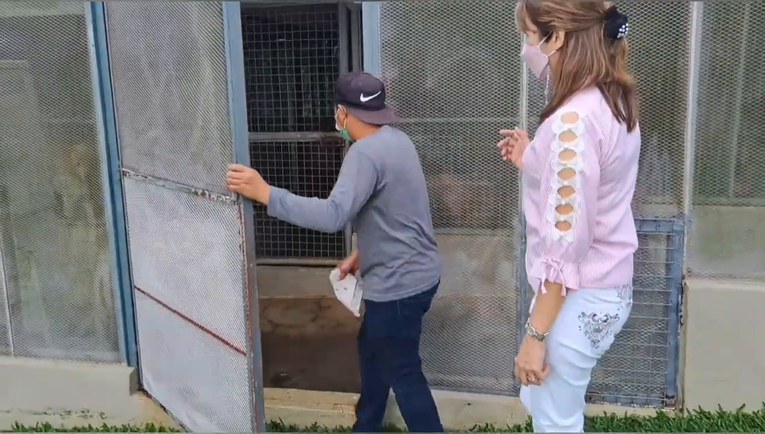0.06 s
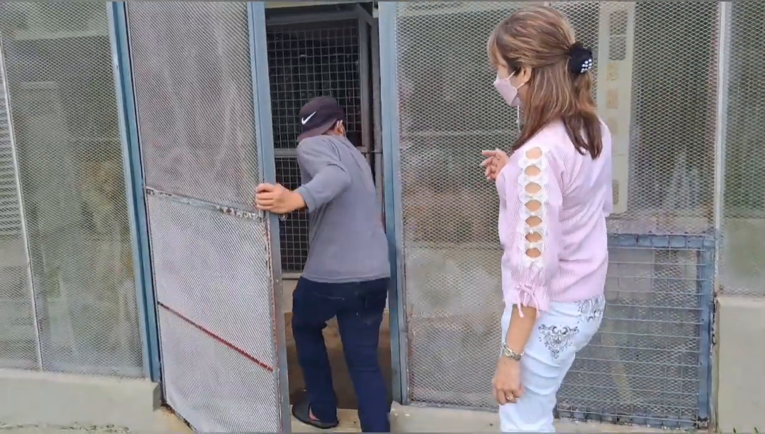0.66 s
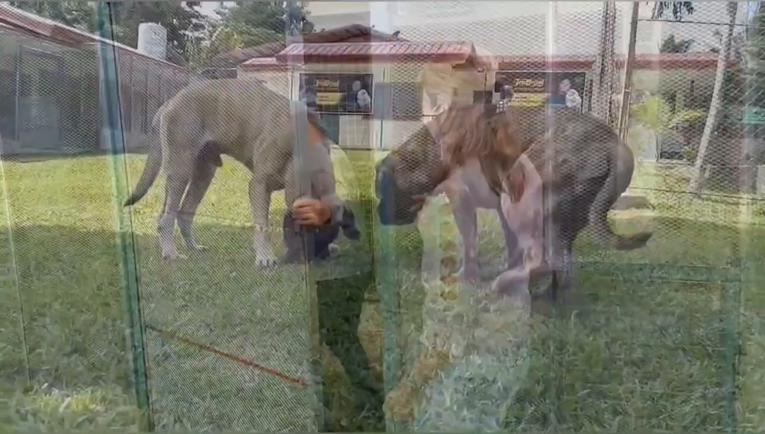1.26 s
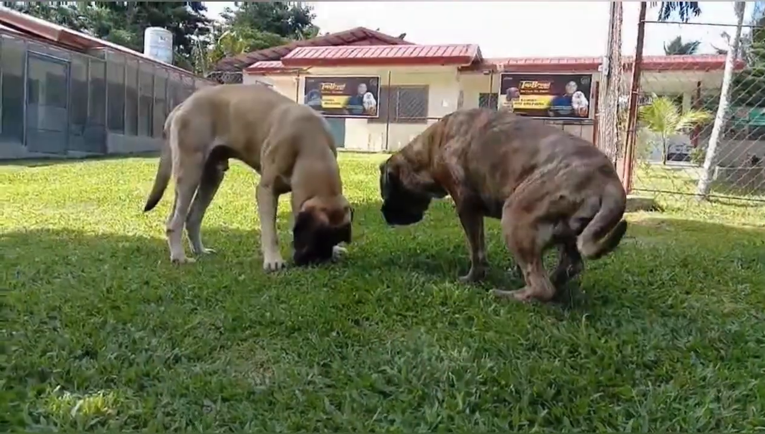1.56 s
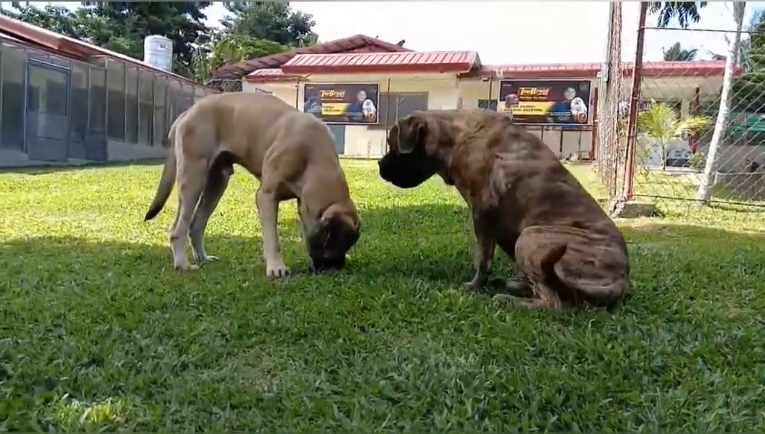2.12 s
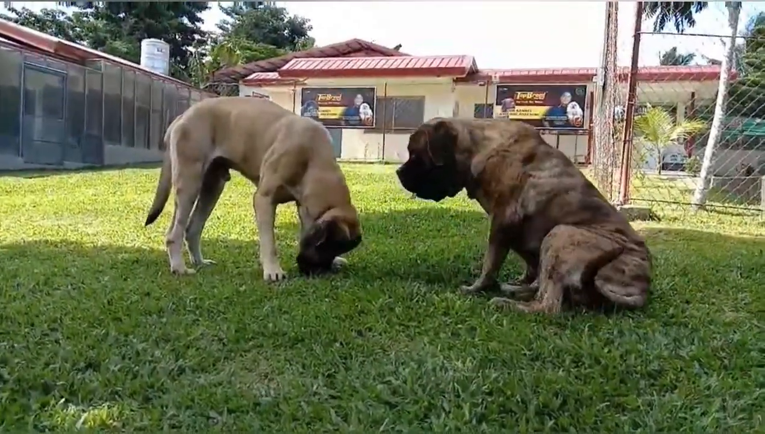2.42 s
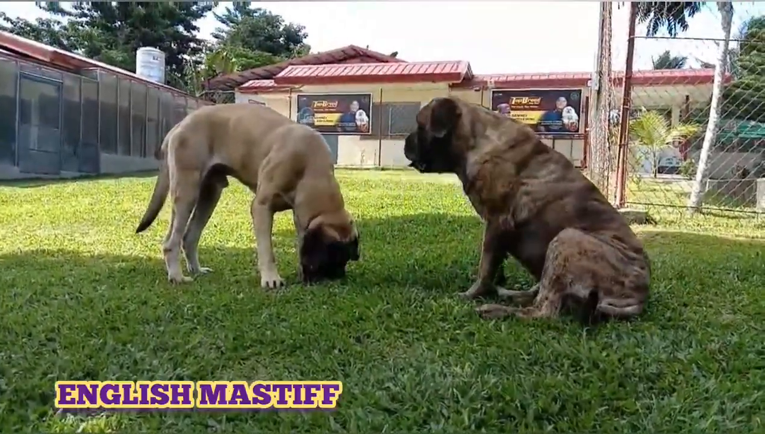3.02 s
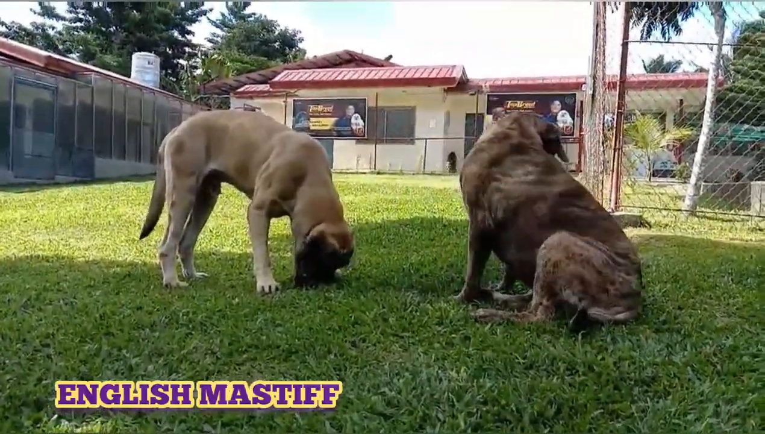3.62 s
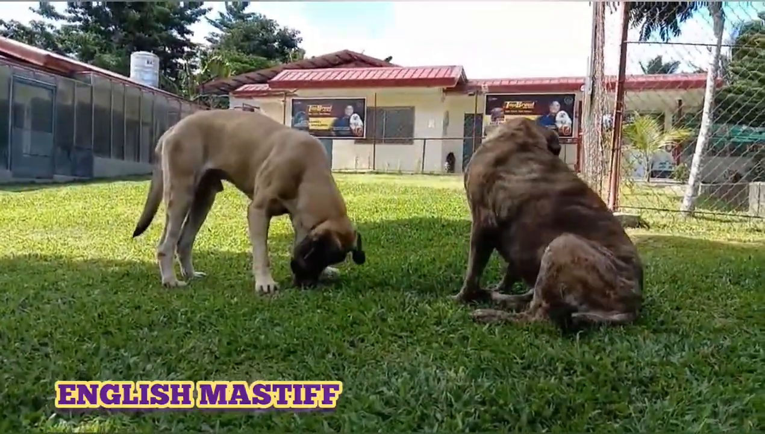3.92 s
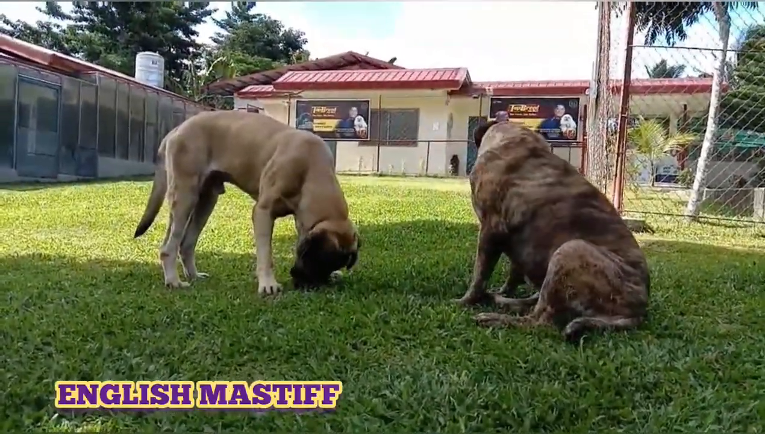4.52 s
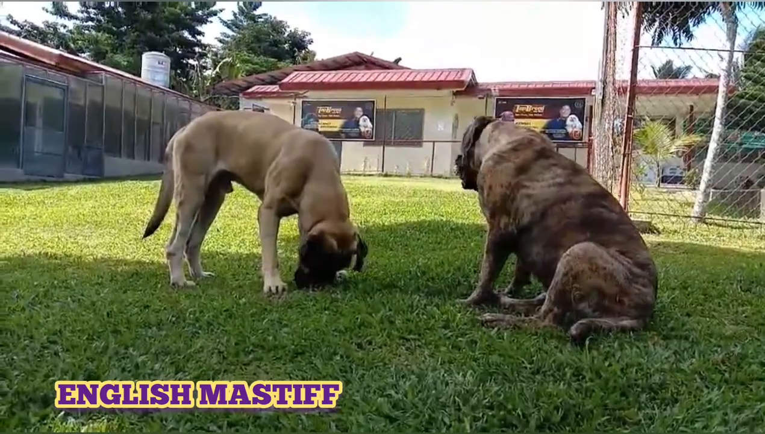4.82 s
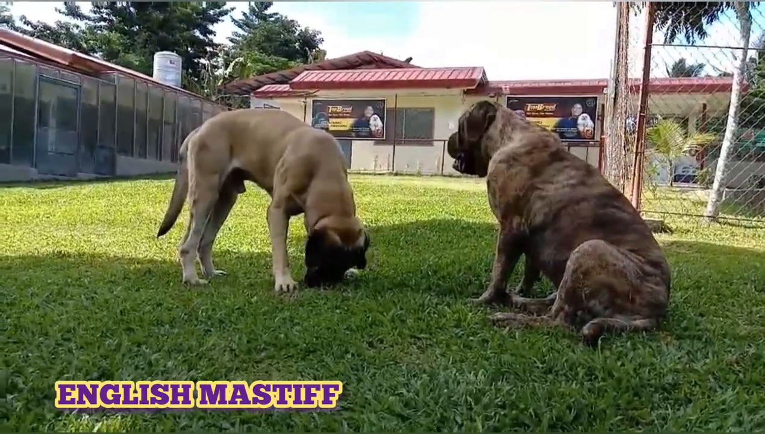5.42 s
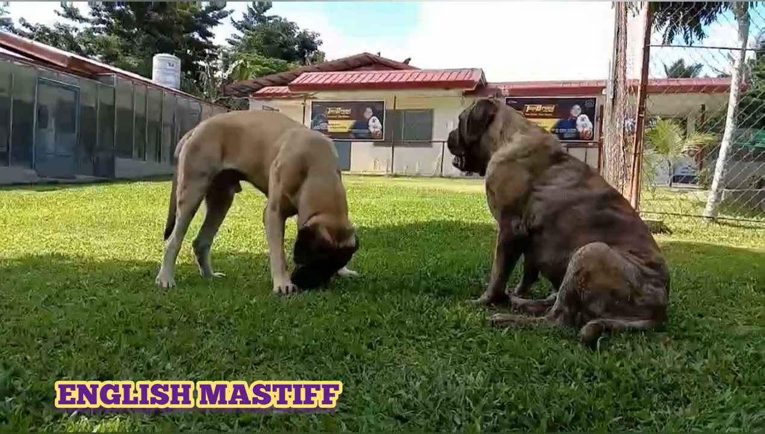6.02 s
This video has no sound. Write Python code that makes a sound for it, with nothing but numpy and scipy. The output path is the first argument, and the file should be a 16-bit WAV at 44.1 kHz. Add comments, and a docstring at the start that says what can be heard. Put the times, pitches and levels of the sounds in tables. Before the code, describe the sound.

A large dog gives two quick pairs of loud, rough barks in a ringing concrete kennel, slightly right of the microphone. A mesh door scrapes and clicks over soft shuffling. The dog adds a fainter yelp and woof as the kennel fades into an open lawn, where insects hiss steadily, birds whistle far away and two soft, low hoots sound.

```python
"""A mastiff barks in two quick pairs, groans and yelps in a concrete kennel, a little right of a stereo
microphone pair. Its vocal folds pulse roughly through throat and mouth, and the walls ring. A mesh door
scrapes and clicks over shuffling and a faint outdoor rumble. The kennel fades into a sunny lawn, heard
straight ahead: insects hiss in two high bands, birds whistle far off and two soft low hoots sound."""
import sys
import numpy as np
from scipy import signal
from scipy.fft import rfft, irfft, next_fast_len
from scipy.io import wavfile
from scipy.ndimage import uniform_filter1d

SR = 44100
rng = np.random.default_rng(int(sys.argv[2]) if len(sys.argv) > 2 else 0)


def dump(signal):
    """Clip the signal to [-1, 1] and save it as 16-bit WAV at the path in sys.argv[1]."""
    limited = np.clip(np.atleast_2d(signal).T, -1, 1)
    pcm = np.round(limited * 32767).astype(np.int16)
    wavfile.write(sys.argv[1], SR, pcm)


N = 276507
TIME = np.arange(N) / SR


# The dog's throat and mouth, one shape per kind of call. Each row: frequency in Hz, gain in dB.
THROAT_1 = [(120, -25), (270, -16), (420, -4), (570, -1), (870, -5), (1150, -6.5), (1420, -15),
            (1700, -9.5), (1950, -14.5), (2280, -10.5), (2700, -20), (3200, -21), (4000, -25.5),
            (5200, -22.5), (6500, -37), (15000, -40)]
THROAT_2 = [(120, -27.5), (240, -15.5), (370, -11.5), (470, 2.5), (540, -2), (780, -13.5), (1100, -17),
            (1400, -18.5), (1680, -15), (1880, -22.5), (2120, -18), (2600, -26), (2900, -27.5),
            (4500, -32.5), (15000, -48)]
THROAT_3 = [(130, -30.5), (310, -17.5), (450, -4.5), (630, -4.5), (950, 0), (1260, -4), (1550, -11.5),
            (1950, -13), (2800, -25), (3700, -26.5), (4450, -16), (6000, -29.5), (9000, -41), (15000, -53)]
THROAT_4 = [(130, -33), (300, -19), (450, -9.5), (620, -3.5), (930, 1), (1240, -13), (1600, -11.5),
            (2000, -17), (2800, -28.5), (4700, -32.5), (9000, -48.5), (15000, -55)]
THROAT_WOOF = [(250, -18), (580, -12), (850, 0), (1150, -14), (2200, -17), (4000, -35), (15000, -55)]
THROAT_YELP = [(250, -25), (690, -6), (1050, -2), (1380, 0), (2050, -7), (2800, -17), (6000, -36),
               (15000, -55)]
# Each row: start, attack, hold and release in seconds, mouth level at full effort in dB, start, top and
# end pitch in Hz, roughness from 0 to 1, chest tone at full effort in dB, throat shape.
CALLS = [(.052, .056, .092, .12, -7.5, 180, 288.1, 278.8, 0.39, -33, THROAT_1),
         (.322, 0.057, 0.12, 0.018, -7, 190, 271.4, 259, 0.3, -30, THROAT_2),
         (0.466, 0.038, 0.084, .04, -22.5, 220, 212.6, 202.7, 0.25, -24, THROAT_2),
         (1.014, .046, 0.084, .1, -7, 205, 315.7, 308.7, 0.3, -32, THROAT_3),
         (1.303, .075, 0.064, .045, -7, 220.3, 315.4, 303, 0.23, -37.5, THROAT_4),
         (1.562, .036, 0.049, 0.076, -17, 402.6, 698.7, 646, 0.17, -57, THROAT_YELP),
         (1.687, .05, .02, 0.016, -11.5, 229, 293, 290, .3, -51, THROAT_WOOF)]

def dog(pan_db=1.43):
    """Right of centre in the kennel: two barks, a low groan, two more barks, a yelp and a last woof."""
    dry = np.zeros(N)
    for start, attack, hold, release, db, start_hz, top_hz, end_hz, held_rough, chest_db, throat in CALLS:
        effort_db, hz, rough = call_contour(attack, hold, release, start_hz, top_hz, end_hz, held_rough)
        add(dry, start, bark(effort_db, hz, rough, throat, db, chest_db))
    return widen(kennel(dry)) * undb([[-pan_db], [pan_db]])


def call_contour(attack, hold, release, start_hz, top_hz, end_hz, held_rough):
    """Effort climbs, sags and drops; the folds roughen as the pitch scoops up and as the voice runs out."""
    onset_db, sag_db_per_s, release_db, shudder_db = 26, 25, 15, 1.4
    settle_s, waver = .025, .014
    t = np.arange(0, attack + hold + release, 1 / SR)
    released_s = np.maximum(t - attack - hold, 0)
    spent = (released_s / release) ** .7  # quickly at first, then slowly
    effort_db = -onset_db * np.maximum(1 - t / attack, 0)
    effort_db -= sag_db_per_s * np.clip(t - attack, 0, hold) + release_db * spent
    effort_db += shudder_db * wander(80, len(t))
    scoop = np.maximum(1 - t / (1.55 * attack), 0)
    settled = 1 - np.exp(-released_s / settle_s)
    hz = top_hz + (start_hz - top_hz) * scoop + (end_hz - top_hz) * settled
    hz *= 1 + waver * wander(30, len(t))
    rough = np.clip(held_rough + .35 * scoop + .33 * spent, 0, 1)
    return effort_db, hz, rough


# Harmonic strength at the vocal folds. Each row: frequency in Hz, gain in dB.
VOCAL_FOLDS = [(280, -6), (520, 0), (1250, 0), (2200, -2), (4500, -12)]

def bark(effort_db, hz, rough, throat, db, chest_db):
    """Vocal folds pulse unevenly, air rasps once a cycle, and the mouth opens with the effort."""
    jitter, shimmer_db, smear, rasp_db, shut_hz = .05, 5, .35, 2, 800
    n = len(hz)
    phase = phase_of(hz * (1 + jitter * rough * wander(260, n)))
    # the throat spreads each pulse over the cycle
    pulses = colour(sum(np.cos(k * phase - smear * k * (k - 1)) for k in range(1, 17)), VOCAL_FOLDS)
    pulses *= 1 + .45 * rough * np.cos(phase / 2)  # rough folds alternate strong and weak cycles
    pulses *= undb(shimmer_db * rough * wander(200, n))
    rasp = rng.standard_normal(n) * (1 + .53 * np.cos(phase))
    voice = np.sqrt(1 - rough ** 2) * unit(colour(pulses, throat))
    voice += undb(rasp_db) * rough * unit(colour(rasp, throat))
    # a half-shut mouth muffles the start and the end
    muffled = signal.sosfiltfilt(signal.butter(1, shut_hz, fs=SR, output="sos"), voice)
    opening = np.clip(1.5 + (effort_db + 1.5) / 14, .2, 1)
    mouth = unit(muffled + opening * (voice - muffled)) * undb(db + effort_db)
    # the chest radiates the fundamental even when the mouth is shut
    chest = np.sqrt(2) * np.cos(phase) * undb(chest_db + .15 * effort_db)
    return (mouth + chest) * signal.windows.tukey(n, .08)


# Nearby walls. Each row: delay at the left and at the right microphone in seconds, gain in dB.
REFLECTIONS = [(.0029, .0034, -14), (.0118, .0112, -15), (.0231, .0236, -15)]
# The diffuse echo. Each row: frequency in Hz, seconds to fall by 60 dB.
ECHO_DECAY = [(100, .8), (600, 0.95), (1000, .65), (2000, .72), (5000, .55), (15000, .3)]
# Standing waves between the walls. Each row: frequency in Hz, seconds to fall by 60 dB, gain in dB.
STANDING_WAVES = [(206.5, .65, 4.5), (558, 1, -12), (632, .75, -4), (1696, .6, -15.5)]

def kennel(x, direct_db=-2, echo_db=-5, right_lag_s=.00009, build_s=.008):
    """Concrete walls: the microphones get direct sound, first reflections, echo and standing waves."""
    early = undb(direct_db) * np.array([x, delay(x, right_lag_s)])
    for left_s, right_s, db in REFLECTIONS:
        early += undb(db) * np.array([delay(x, left_s), delay(x, right_s)])
    t = TIME[:SR]
    band_hz, frame_s, cells = signal.stft(diffuse(SR), SR, nperseg=256)
    cells *= np.exp(-np.log(1000) * frame_s / at_freq(ECHO_DECAY, band_hz)[:, None])
    tail = signal.istft(cells, SR)[1][:, :SR] * (1 - np.exp(-t / build_s))
    response = undb(echo_db) * unit(tail) / np.sqrt(2 * SR)
    for hz, t60, db in STANDING_WAVES:
        damping = np.log(1000) / t60
        response += undb(db) * 2 * damping / SR * np.exp(-damping * t) * np.cos(2 * np.pi * hz * t)
    return early + signal.fftconvolve(x[None], response)[:, :N]


# Width of the microphone pair. Each row: frequency in Hz, gain of left minus right in dB.
STEREO_WIDTH = [(150, -9.5), (300, -4.5), (550, 1), (1000, 5.5), (2200, 1.5), (5000, -2)]

def widen(pair):
    """The stereo pair stresses the difference between left and right in the midrange."""
    mid = (pair[0] + pair[1]) / 2
    side = colour((pair[0] - pair[1]) / 2, STEREO_WIDTH)
    return np.array([mid + side, mid - side])


# The bright sound of the mesh. Each row: frequency in Hz, relative level in dB.
MESH_SPECTRUM = [(800, -27), (2500, -4.5), (4500, 2), (7500, -4), (10000, -6.5), (15000, -15)]
# The door scraping. Each row: start in seconds, peak in dB, rise and decay in seconds.
DOOR_SCRAPES = [(.332, -28, .083, .1)]
# Door and latch clicks. Each row: start in seconds, peak in dB before click_gain_db.
DOOR_CLICKS = [(0.34, -19.5), (.5095, -31), (0.9475, -24.5), (1.3423, -37.5)]

def door(click_decay_s=.018, click_gain_db=-9, grit_db=1):
    """The kennel's mesh door gives a gritty scrape and a few short rattling clicks."""
    force = sum(swell(*scrape) for scrape in DOOR_SCRAPES) * undb(grit_db * wander(270, N))
    for start, db in DOOR_CLICKS:
        add(force, start, undb(db + click_gain_db) * np.exp(-TIME[:SR // 8] / click_decay_s))
    return force * unit(colour(diffuse(N), MESH_SPECTRUM))


# Rumble and shuffling around the kennel. Each row: frequency in Hz, relative level in dB.
RUMBLE_SPECTRUM = [(20, -20), (35, -13.5), (60, -3.5), (100, -4), (150, 0.5), (250, -13), (500, -33)]
SHUFFLE_SPECTRUM = [(90, -20), (160, -3), (300, -2), (500, -2), (800, -5), (1500, -11), (2500, -17),
                    (4200, -23), (7000, -27), (10000, -32), (15000, -35)]
# At the doorway. Each row: start in seconds, peak in dB, rise and decay in seconds.
DOORWAY_SCUFFS = [(.79, -29, .075, .05)]

def yard(rumble_db=-35.5, shuffle_db=-29, flutter_db=2.5, uneven_db=1.2):
    """Low rumble and uneven shuffling reach the microphones from all sides, with one louder scuff."""
    rumble = unit(colour(diffuse(N), RUMBLE_SPECTRUM)) * undb(rumble_db + flutter_db * wander(25, N))
    force = undb(shuffle_db) + sum(swell(*scuff) for scuff in DOORWAY_SCUFFS)
    shuffle = unit(colour(diffuse(N), SHUFFLE_SPECTRUM)) * force * undb(uneven_db * wander(32, N))
    return rumble + shuffle


# The two insect bands on the lawn. Each row: frequency in Hz, relative level in dB.
LOW_CHORUS = [(2600, -40), (3900, -16.5), (4500, -10.5), (5000, -5), (5650, -1.5), (6800, -4), (7500, -9),
              (8200, -16), (10000, -31), (15000, -53)]
HIGH_CHORUS = [(6000, -49.5), (9200, -14), (11200, -9.5), (12400, -6), (13700, -3), (15300, 1)]
# Each row: time in seconds, level of the low and of the high chorus in dB before their gains.
CHORUS_LEVELS = [(1.2, -40.5, -48), (1.55, -38.5, -41), (1.61, -34, -38), (1.98, -36, -36.5),
                 (2.16, -34, -38.5), (2.26, -37.5, -42), (2.81, -35, -34.5), (2.99, -34.5, -38),
                 (4.12, -37.5, -43), (4.71, -34.5, -39), (4.88, -34, -34), (5.89, -31.5, -31),
                 (6.27, -34, -35)]

def insects(low_gain_db=1, high_gain_db=6):
    """Out on the lawn, one chorus hisses near 6 kHz and a thinner one at the top of hearing."""
    times, low_db, high_db = np.transpose(CHORUS_LEVELS)
    low = chorus(LOW_CHORUS, np.interp(TIME, times, low_db) + low_gain_db, throb=.059, side_db=-53)
    high = chorus(HIGH_CHORUS, np.interp(TIME, times, high_db) + high_gain_db, throb=.051, side_db=-44)
    return low + high


def chorus(spectrum, db, throb, side_db, throb_hz=9.2, grain_db=1.5):
    """Many insects rasp at once: fine grains of hiss with a slight common throb."""
    beat = np.sin(phase_of(throb_hz * (1 + .085 * wander(3.2, N))))
    mid, side = rng.standard_normal((2, N)) * undb(grain_db * wander(900, N))
    pair = mid + undb(side_db) * side * np.array([[1], [-1]])
    return unit(colour(pair, spectrum)) * undb(db) * (1 + throb * beat)


# Far birds. Each row: start and length in seconds, start and end pitch in Hz, level in dB.
WHISTLES = [(1.78, .12, 3650, 2900, -43), (2.12, .08, 3550, 3150, -44), (2.36, .09, 3720, 3300, -44),
            (2.47, .06, 3150, 3000, -46), (2.68, .14, 3150, 3280, -48), (3.04, .12, 3520, 3080, -43),
            (3.42, .09, 3350, 3200, -46), (5.36, .18, 3250, 3080, -46), (5.66, .08, 3250, 3000, -47),
            (6.01, .13, 3800, 3100, -43)]
# Birds that warble on and on. Each row: pitch in Hz, swing as a share of the pitch, level in dB.
WARBLERS = [(3154, 0.038, -54), (3300, .035, -53), (3700, .018, -52), (2520, .035, -66.5)]
# The blur of the farthest birds. Each row: frequency in Hz, relative level in dB.
FAR_BIRD_SPECTRUM = [(2300, -28), (2850, -9), (3150, -4.5), (3480, -2.5), (3720, 1.5), (4000, -18),
                     (4600, -26.5)]

def birds(waver=.02, blur_db=-50, flicker_db=4, scatter_s=.018):
    """Distant warbling and mostly falling whistles, scattered by the trees, over a blur of farther calls."""
    song = np.zeros(N)
    for start, length, start_hz, end_hz, db in WHISTLES:
        n = int(length * SR)
        hz = np.linspace(start_hz, end_hz, n) * (1 + waver * wander(300, n))
        add(song, start, undb(db) * np.sqrt(2 * np.hanning(n)) * np.sin(phase_of(hz)))
    for centre_hz, swing, db in WARBLERS:
        hz = centre_hz * (1 + swing * wander(22, N) + waver * wander(300, N))
        song += undb(db + flicker_db * wander(13, N)) * np.sin(phase_of(hz))
    t = TIME[:SR // 4]
    trees = rng.standard_normal(len(t)) * np.exp(-t / scatter_s)
    scattered = signal.fftconvolve(song, trees / np.linalg.norm(trees))[:N]
    blur = unit(colour(rng.standard_normal(N), FAR_BIRD_SPECTRUM)) * undb(blur_db + 2 * wander(17, N))
    return .6 * song + .8 * scattered + blur


# Each row: start in seconds, pitch in Hz, peak in dB, rise and decay in seconds.
HOOTS = [(2.132, 339, -45.5, 0.012, 0.022), (5.867, 334, -36.5, 0.013, 0.014)]

def hoots():
    """Two short, nearly pure low notes sound softly across the lawn."""
    out, t = np.zeros(N), TIME[:SR // 8]
    for start, hz, db, rise, decay in HOOTS:
        envelope = np.minimum((t / rise) ** 2, np.exp((rise - t) / decay))
        add(out, start, undb(db) * envelope * np.sin(2 * np.pi * hz * t))
    return out


# Open air over the lawn. Each row: frequency in Hz, relative level in dB.
AIR_SPECTRUM = [(25, -25), (60, -12), (100, 1.5), (125, -2.5), (155, 2), (220, -7), (330, -14.5),
                (600, -20.5), (950, -12), (1400, -1.5), (1800, -9.5), (2300, -9), (3000, -13), (5000, -12)]

def open_air(level_db=-50, swell_db=1):
    """A faint, gently swelling outdoor rumble and hush, the same at both microphones."""
    return unit(colour(rng.standard_normal(N), AIR_SPECTRUM)) * undb(level_db + swell_db * wander(5.8, N))


def diffuse(size, spacing_s=.00085):
    """Noise from all sides at microphones spacing_s apart: alike in the bass, unrelated in the treble."""
    padded = next_fast_len(size)
    alike = .97 * np.sinc(2 * spacing_s * np.fft.rfftfreq(padded, 1 / SR))
    mid, side = rfft(rng.standard_normal((2, padded)))
    mid, side = mid * np.sqrt(1 + alike), side * np.sqrt(1 - alike)
    return unit(irfft(np.array([mid + side, mid - side]), padded)[:, :size])


def swell(start_s, db, rise_s, decay_s):
    """A force that grows evenly to its peak and dies away."""
    t = np.maximum(TIME - start_s, 0)
    return undb(db) * np.minimum(t / rise_s, 1) * np.exp(-np.maximum(t - rise_s, 0) / decay_s)


def wander(rate, size):
    """Smooth random wander of spread 1 with about rate turns a second."""
    step = max(int(SR / rate), 1)
    stairs = np.repeat(rng.standard_normal(size // step + 1), step)
    return 1.2 * uniform_filter1d(stairs, step)[:size]


def colour(x, points):
    """Filter by a spectrum of (Hz, dB) points."""
    n = x.shape[-1]
    size = next_fast_len(n + 2048)
    gain = undb(at_freq(points, np.fft.rfftfreq(size, 1 / SR)))
    return irfft(rfft(x, size) * gain, size)[..., :n]


def at_freq(points, f):
    """Read (Hz, value) points on a log-frequency axis."""
    hz, value = np.transpose(points)
    return np.interp(np.log(f + 1), np.log(hz), value)


def phase_of(hz):
    """Running phase in radians of a changing frequency."""
    return 2 * np.pi * np.cumsum(hz) / SR


def undb(db):
    """Decibels to gain."""
    return 10 ** (np.asarray(db) / 20)


def unit(x):
    """Scale to rms 1."""
    return x / np.sqrt(np.mean(x ** 2) + 1e-20)


def delay(x, seconds):
    """The same sound a little later."""
    return np.interp(TIME - seconds, TIME, x, left=0)


def add(out, start_s, x):
    """Mix x into out from a given time."""
    i = max(int(start_s * SR), 0)
    out[..., i:i + x.shape[-1]] += x[..., :N - i]


def fade(silent_s, full_s):
    """A gain that runs evenly between silence and full level."""
    return np.clip((TIME - silent_s) / (full_s - silent_s), 0, 1)


def scene():
    """Two places: the kennel dissolves into the lawn while the dog is still calling."""
    at_kennel = dog() + door() + yard()
    on_lawn = open_air() + birds() + hoots() + insects()
    return at_kennel * fade(silent_s=1.774, full_s=1.143) ** .91 + on_lawn * fade(silent_s=.96, full_s=1.22)


def record(dry, top_hz=15520):
    """The recorder rounds the loudest peaks at full scale and cuts the highest treble."""
    rounded = dry / (1 + dry ** 8) ** (1 / 8)
    return signal.sosfilt(signal.ellip(12, .1, 70, top_hz, fs=SR, output="sos"), rounded)


dry = scene()
out = record(dry)
dump(out)
```